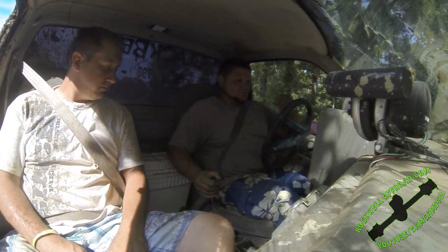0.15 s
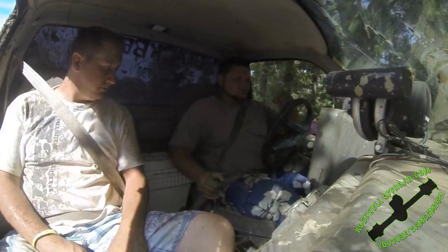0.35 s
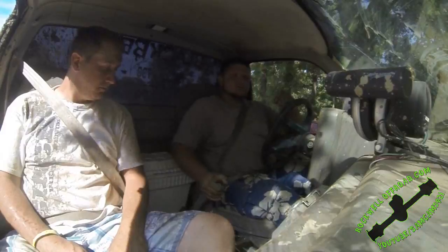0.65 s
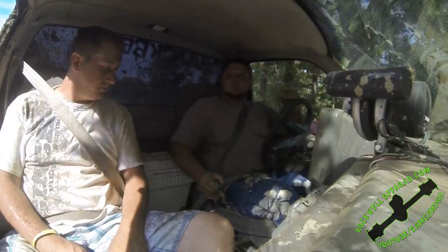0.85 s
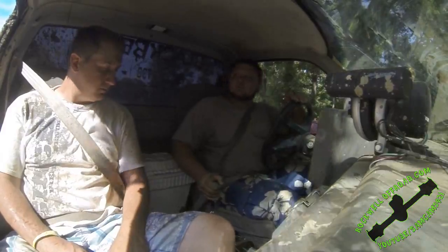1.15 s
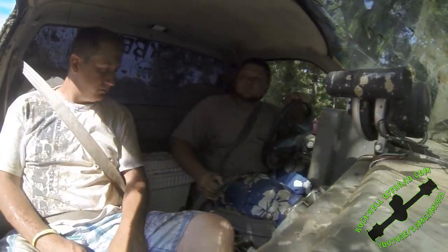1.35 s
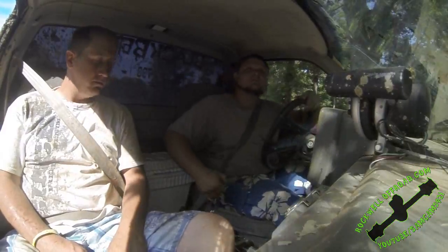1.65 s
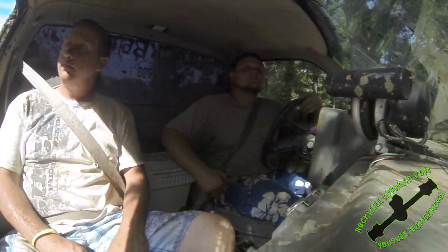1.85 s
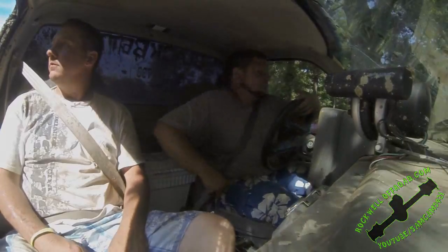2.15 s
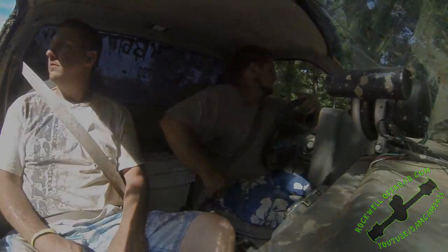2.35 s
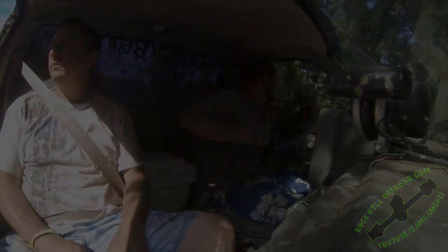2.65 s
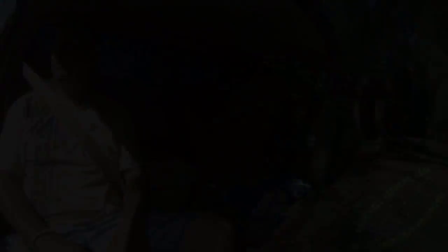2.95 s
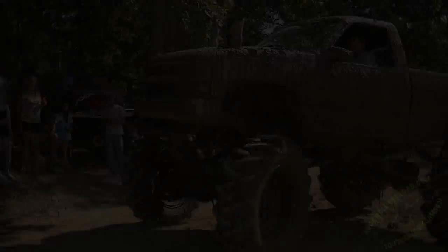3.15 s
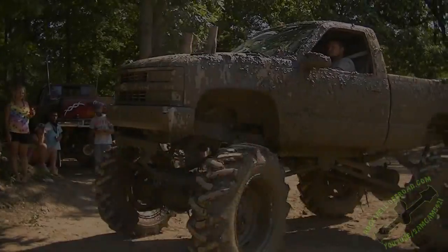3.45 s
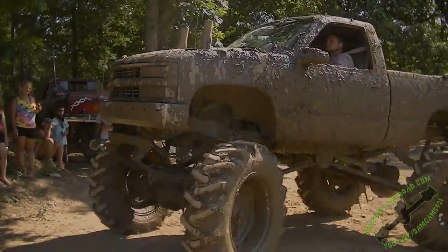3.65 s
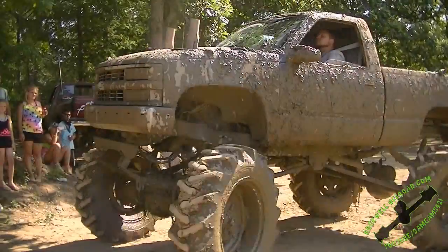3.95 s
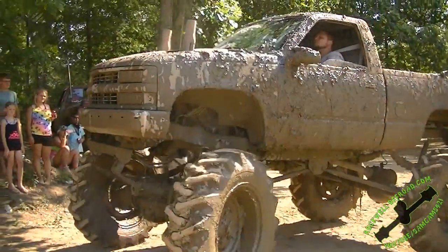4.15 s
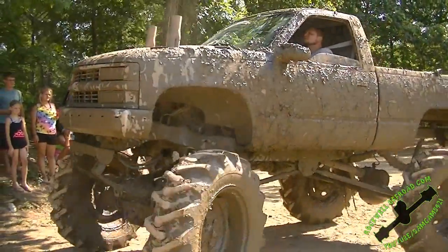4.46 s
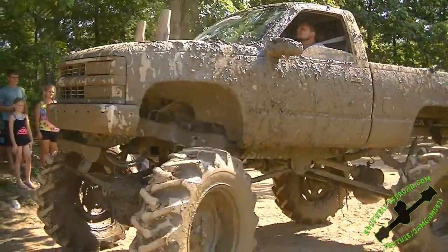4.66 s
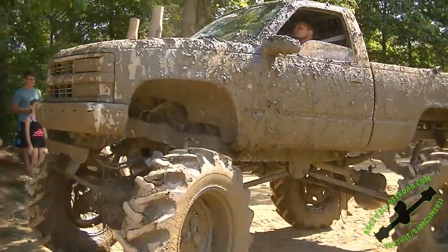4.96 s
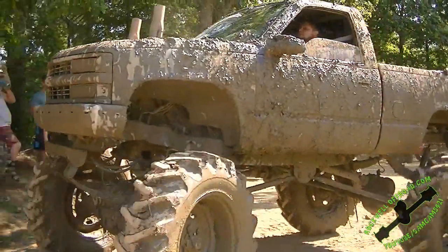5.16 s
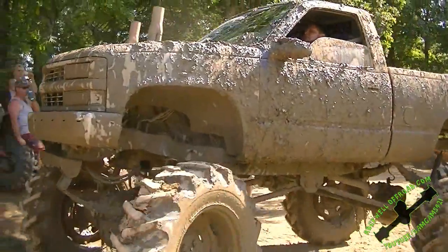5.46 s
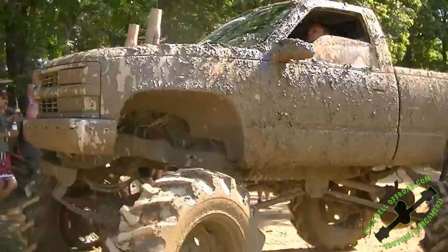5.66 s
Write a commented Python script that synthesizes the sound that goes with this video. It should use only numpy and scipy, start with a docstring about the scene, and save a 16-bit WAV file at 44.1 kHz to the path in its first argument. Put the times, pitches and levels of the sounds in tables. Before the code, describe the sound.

A big truck's V8 lopes at idle, heard inside the cab as a thumping, stumbling boom with bouts of muffled clatter and faint ticks from a loose fitting. One hard knock comes after about a second. The cab fades out, and a truck's open exhaust stacks fade in close by outdoors, louder and harsher, barking and rasping with sharp fuel pops that overload the microphone.

```python
"""First a mud truck's V8 lopes at idle, heard in the cab: its firings pump the air into a thumping,
stumbling boom and shake out bouts of muffled clatter, while a loose fitting ticks. After a second
comes one knock. By three seconds the cab has faded out, and a truck with open exhaust stacks fades in,
close by outside. Each firing sends a shock up its pipe that bounces to and fro and tears out a burst
of jet noise at every return; fuel pops join in and overload the microphone."""
import sys
import numpy as np
from scipy import signal
from scipy.fft import rfft, irfft, next_fast_len
from scipy.io import wavfile
from scipy.ndimage import uniform_filter1d, map_coordinates

SR = 44100
rng = np.random.default_rng(int(sys.argv[2]) if len(sys.argv) > 2 else 0)


def persist_wave(psi):
    """Save psi, clipped to +-1, as 16-bit WAV."""
    counts = np.round(np.clip(psi, -1, 1) * 32767).astype(np.int16)
    wavfile.write(sys.argv[1], SR, np.atleast_2d(counts).T)


N = 255780

# speed of the engine outside: time_s, speed_rpm
OUTSIDE_SPEED = [(3.056, 799), (3.9, 803), (4.15, 772), (4.35, 803), (4.8, 795), (5.05, 820), (5.25, 812),
                 (5.4, 775), (5.55, 722), (5.8, 675)]
# prominent firings of a cycle, spaced by unequal pipes: place_in_firings, strength_db, extra_bark_db
CYLINDERS = [(.15, -1.5, -2.5), (.72, 0, -1), (1.92, -2.3, 2), (3.1, -.8, -.5), (3.58, -1.5, 2.5),
             (5.45, -4, 1), (6.12, -.8, 1)]
# harder, later burns: time_s, bark_change_db, rasp_change_db
HARD_BURNS = [(3.173, -0.5, 0), (3.366, 3, 1.5), (3.4, 2.5, 1.5), (3.475, 0.5, 0.5), (3.512, 1, 0.5),
              (3.675, -3.5, -1.5), (3.821, -1.5, 1), (3.868, 0.5, -0.5), (3.921, -0.5, 1.5),
              (3.97, -0.5, -0.5), (4.022, -0.5, 0), (4.17, -4, 1.5), (4.225, -0.5, 1.5), (4.278, -1.5, 1),
              (4.379, -0.5, 1), (4.433, 1, 2.5), (4.529, -1.5, 1.5), (4.625, -4, 0), (4.68, -3, 2),
              (4.73, -2, 4), (4.778, -2.5, 3), (4.875, 1, 1.5), (4.925, 1, 3), (4.97, 0, 2.5),
              (5.028, -2, 2), (5.075, -0.5, 1), (5.174, -0.5, 6), (5.225, -1, 0), (5.272, -1.5, 1.5),
              (5.324, -1, 0), (5.424, -2.5, -0.5), (5.53, -1, 2.5), (5.64, -1, 1), (5.71, -1.5, 1.5),
              (5.775, 0, 0.5)]
# misfires, mostly slight dips in the exhaust: time_s, change_db
MISFIRES = [(3.192, -2.5), (3.34, -4), (3.49, -2), (3.595, -1), (3.787, -3), (3.893, -2.5), (4.042, -2.5),
            (4.099, -0.5), (4.2, -1.5), (4.254, -2), (4.345, -1), (4.393, -0.5), (4.492, -0.5),
            (4.548, -0.5), (4.648, 1), (4.85, 1), (5.147, -0.5), (5.242, -3), (5.293, 1), (5.44, 1),
            (5.499, -0.5)]
# unburnt fuel igniting in the stacks: time_s, level_db, pitch_hz, half_length_s
POPS = [(3.421, -4, 750, .005), (3.624, -4.5, 1080, .004), (3.686, -6, 980, .008), (3.723, -5.5, 870, .004),
        (3.774, -3, 870, .005), (3.922, -6, 530, .004), (3.994, -3, 810, .008), (4.026, -3, 870, .004),
        (4.161, -4, 600, .004), (4.175, -4, 960, .005), (4.295, -2, 1150, .007), (4.327, -2, 1150, .008),
        (4.379, -5, 950, .004), (4.424, -6, 890, .004), (4.447, -4, 1300, .004), (4.48, -5, 1010, .004),
        (4.587, -2, 870, .004), (4.599, -3, 1250, .004), (4.627, -4, 820, .005), (4.68, -2, 610, .005),
        (4.777, -3, 1230, .005), (4.879, -1, 710, .005), (4.902, -4, 700, .004), (4.928, -1, 1220, .005),
        (4.979, -4, 930, .004), (4.996, -5, 1040, .003), (5.025, -5, 790, .004), (5.126, 0, 620, .004),
        (5.174, -5, 590, .005), (5.275, -2, 820, .007), (5.306, -5, 550, .004), (5.319, -1, 1070, .004),
        (5.374, -6, 1150, .005), (5.423, -4, 1100, .004), (5.475, -1, 1110, .005), (5.528, -5, 740, .005),
        (5.589, -5, 860, .004)]
# spectra of the shock leaving the pipe, the jet's bark and its rasp: frequency_hz, gain_db
SHOCK_SPECTRUM = [(20, -13), (65, -21), (100, -15), (170, -1.5), (215, 0), (255, 3.5), (320, 1.5),
                  (390, -3), (460, -4.5), (530, 4.5), (700, -8), (1600, -10), (4000, -73)]
BARK_SPECTRUM = [(150, -23.5), (300, -5.5), (420, -2.5), (560, -0.5), (700, 1.5), (900, 2.5), (1250, -2),
                 (1600, -11.5), (2300, -10), (3200, -21), (5000, -25), (12000, -47)]
RASP_SPECTRUM = [(600, -44.5), (1500, 1.5), (3000, 1.5), (4200, -1.5), (5200, -2.5), (7000, -1.5),
                 (9000, -3.5), (10800, -4), (12500, -10), (15800, -17)]

# speed of the engine heard in the cab: time_s, firing_rate_hz
CAB_SPEED = [(0, 43), (.15, 43.6), (.45, 44), (.65, 41.6), (.77, 48), (.86, 55.5), (1.08, 50), (1.25, 45.3),
             (1.5, 50.4), (1.66, 57), (1.8, 47), (1.96, 37.4), (2.13, 44.7), (2.43, 41.2), (2.6, 48),
             (3.05, 45)]
# throb at the firing rate, and drone of the cab's air resonance: time_s, level_db
THROB_LEVEL = [(0, -17.5), (.18, -19), (.23, -23), (.29, -19), (.46, -16.5), (.52, -22), (.63, -15),
               (.72, -19), (.79, -20), (.86, -20.5), (1.05, -21), (1.26, -17.5), (1.4, -18.5), (1.52, -20),
               (1.65, -16), (1.74, -24), (1.8, -17.5), (1.87, -32), (1.96, -19.5), (2.13, -15), (2.2, -24),
               (2.33, -20.5), (2.44, -17.5), (2.54, -22), (2.78, -20), (2.9, -19.5)]
DRONE_LEVEL = [(0, -22.5), (.14, -31), (.22, -37), (.28, -22.5), (.44, -24.5), (.51, -28), (.62, -18.5),
               (.86, -26), (1.0, -30), (1.3, -28), (1.39, -28), (1.5, -31), (1.75, -29), (1.88, -29.5),
               (2.13, -25.5), (2.24, -36), (2.42, -30), (2.54, -32), (2.63, -30), (2.75, -40)]
# strong burns thumping the cab: time_s, boom_change_db, panel_change_db
CAB_THUMPS = [(.13, 6, -8), (.177, 6.5, 4), (.29, 4, 2), (.365, 1.5, 4), (.575, 2.5, 1), (.636, -1, 3),
              (.717, 1, 1), (.84, 1.5, -1), (.883, 1, -1), (.975, 8, 3), (1.086, 3.5, 2), (1.21, 4, 2),
              (1.287, 0, 2), (1.458, 6, -3), (1.565, 4.5, 3), (1.662, 3.5, 2.5), (1.793, 6, 1),
              (1.948, 7, 0), (2.136, 3, 4.5), (2.266, 7.5, 1.5), (2.345, 2, 0), (2.432, 2.5, -4),
              (2.517, 3, 1), (2.637, 2, 0.5)]
# stumbles of the engine, in which the boom drops: time_s, change_db
STUMBLES = [(.1, -2), (.225, -7), (.245, -9), (.34, -4), (.53, -6), (.605, -4), (.68, -6), (.76, 0),
            (.998, -9), (1.045, 0), (1.16, -4), (1.255, -3), (1.513, -5), (1.603, -8), (1.705, 0),
            (1.76, 0), (1.86, 0), (1.915, 0), (2.19, -3), (2.225, -8), (2.305, -5), (2.368, -13),
            (2.485, -5), (2.705, -7), (2.82, -8), (2.92, -5)]
# bouts of harder shaking: start_s, length_s, rise_db
SHAKES = [(0, 0.0082, 27), (0.064, 0.092, 7.5), (0.234, 0.066, 7), (0.489, 0.14, 8), (0.767, 0.13, 5.5),
          (0.942, 0.19, 4.5), (1.356, 0.11, 8), (1.52, 0.19, 4), (1.723, 0.073, 6), (1.89, 0.23, 6.5),
          (2.226, 0.26, 7), (2.571, 0.056, 7.5)]
# harder engine beats: start_s, level_db
CLANKS = [(.421, -43), (.795, -43), (.903, -43), (1.022, -44), (1.437, -43), (1.531, -39), (1.632, -40),
          (1.65, -41), (1.77, -37), (2.121, -35.5), (2.231, -44), (2.774, -43), (2.862, -50)]
# a first touch, the hard knock and its rebound: start_s, level_db
KNOCK_BLOWS = [(1.0688, -29), (1.0707, -22), (1.0765, -35)]
# ticks of the loose fitting: start_s, level_db
TICKS = [(.124, -44), (.172, -41.5), (.183, -44.5), (.285, -43), (.306, -48), (.57, -48), (.633, -48),
         (.837, -49), (.885, -46), (.974, -44), (1.088, -49), (1.209, -45), (1.286, -51), (1.455, -48),
         (1.494, -50), (1.547, -48), (1.582, -48), (1.661, -42), (1.785, -45), (1.799, -46), (1.946, -49),
         (2.13, -43), (2.267, -48), (2.444, -43), (2.637, -47), (2.74, -47), (2.874, -50), (2.957, -50)]
# spectra of cab boom, panels, clatter through the firewall, knock contact, ticks: frequency_hz, gain_db
BOOM_SPECTRUM = [(8, -56.5), (19, 1), (28, 3.5), (42, -0.5), (60, -0.5), (75, 1.5), (90, -8.5), (110, -11),
                 (170, -20), (300, -42), (600, -80)]
PANEL_SPECTRUM = [(70, -25.5), (120, -4), (160, -1.5), (200, -11), (250, -1.5), (350, -18), (440, -9),
                  (540, -24), (700, -15.5), (1000, -29), (2000, -66)]
CLATTER_SPECTRUM = [(500, -30), (900, -8), (1200, -2), (1400, -4), (1620, -3.5), (1950, -9), (2250, -9.5),
                    (2750, -14), (3250, -18), (3500, -21), (3850, -20.5), (4300, -25), (5100, -27),
                    (6500, -31.5), (9500, -38), (11800, -46), (14000, -59)]
CONTACT_SPECTRUM = [(400, 6), (1400, 1), (2600, 2.5), (3900, 0), (4900, -6), (5900, 3), (6600, -32)]
TICK_SPECTRUM = [(800, -28), (3000, 10), (5000, 12.5), (7000, 2.5), (10500, -4), (12000, -10.5),
                 (15000, -29)]
# resonances of the firewall and of the knocked object: frequency_hz, bandwidth_hz, gain_db
FIREWALL_MODES = [(1203, 72, -1), (1596, 64, 1), (1717, 44, -2.5), (2198, 51, -6), (3120, 48, -14),
                  (3270, 75, -15)]
KNOCK_MODES = [(577, 130, -9), (890.3, 120, -7), (1140, 160, -3.5), (1420, 190, 2), (1680, 140, 3.5),
               (2540, 140, 3.5), (3030, 190, -5), (3400, 130, -5), (3880, 150, -10), (4120, 150, -8),
               (4860, 160, -22), (5980, 120, -10)]

ROUND_TRIP_S = 0.00517  # a shock's travel down the stack and back
BURN_S, THUMP_S, STUMBLE_S = 0.018, 0.014, 0.012  # half widths of the brief changes of level


def stacks(idle_rpm=800, bark_db_per_rpm=0.01, rasp_db_per_rpm=0.024):
    """Reflection at an open end: each returning shock inverts and throws out a puff of turbulent gas."""
    times, size_db, extra_bark_db, trip = shocks()
    length_draw, bark_draw, hiss_draw, delay_draw, front_draw, sign_draw = (
        rng.standard_normal((len(times), 6)).T)
    nearest = np.searchsorted((times[1:] + times[:-1]) / 2, np.arange(N) / SR)
    hard_bark_db, hard_rasp_db = swells(HARD_BURNS, BURN_S)
    misfire_db, = swells(MISFIRES, BURN_S)
    flow = gas_flow(times, size_db, trip, nearest, length_draw) * amp(hard_rasp_db / 2 + misfire_db / 4)
    puffs = turbulence(flow) * amp(size_db)[nearest]
    jet = unit(puffs * amp(extra_bark_db[nearest] + bark_draw[nearest]) * noise(BARK_SPECTRUM))
    # steepened wave fronts break the hiss into crackles, with one sharp crack in each puff
    crackle = amp(4.2 * wobble(2600) + 1.5 * wobble(500))
    hiss = unit(puffs * amp(hiss_draw[nearest]) * crackle * rng.standard_normal(N))
    fronts = times + .0005 * delay_draw
    cracks = unit(pulses(fronts, amp(size_db + 3 * front_draw) * np.sign(sign_draw), 2 / SR))
    rasp = unit(coloured(hiss + amp(-7) * cracks, RASP_SPECTRUM))
    reflections = pulses(fronts, (-1) ** trip * amp(0.5 * size_db + 2 * front_draw), 0.000099)
    thump = unit(coloured(reflections, SHOCK_SPECTRUM))
    # a faint, wavering hum at twice the firing rate
    hum = amp(3 * wobble(10)) * np.sin(2 * np.pi * 16 * cycles_turned() + 0.25 * wobble(12))
    bark = amp(-2) * jet + amp(-5) * thump + amp(-23) * hum
    over_idle_rpm = curve(OUTSIDE_SPEED) - idle_rpm
    bark_gain = amp(-13 + bark_db_per_rpm * over_idle_rpm + hard_bark_db)
    rasp_gain = amp(-16.5 + rasp_db_per_rpm * over_idle_rpm + hard_rasp_db)
    return (bark_gain * bark + rasp_gain * rasp) * amp(misfire_db)


def shocks(max_trips=9, trip_loss_db=0.8, sustain_db=-3.6, scatter_db=0.8):
    """Damped pipe echoes: a shock weakens to what the flow sustains, until the next firing overruns it."""
    t, cycles = np.arange(N) / SR, cycles_turned()
    place, strength_db, extra_bark_db = np.transpose(CYLINDERS)
    due_cycles = (np.arange(int(cycles[-1]) + 2)[:, None] + place / 8).ravel()
    start = np.interp(due_cycles, cycles, t, right=t[-1] + 1)[:, None]
    trip = np.arange(max_trips)
    # the heat of the gas, and so the travel time, differs from firing to firing
    travel_s = ROUND_TRIP_S * (1 + rng.normal(0, .02, start.shape))
    times = start + travel_s * trip + rng.normal(0, .0002, (len(start), max_trips))
    size_db = np.maximum(np.resize(strength_db, start.shape) - trip_loss_db * trip, sustain_db)
    size_db = size_db + rng.normal(0, scatter_db, start.shape)
    bark_db = np.resize(extra_bark_db, start.shape) * np.exp(-trip / 2)
    alive = (times < np.roll(start, -1, 0) - ROUND_TRIP_S / 2) & (times < t[-1])
    return times[alive], size_db[alive], bark_db[alive], np.broadcast_to(trip, times.shape)[alive]


def cycles_turned():
    """A four-stroke cycle takes two turns: the running count of cycles of the engine outside."""
    running = np.arange(N) / SR > OUTSIDE_SPEED[0][0]
    return np.cumsum(curve(OUTSIDE_SPEED) * running) / SR / 120


def gas_flow(times, size_db, trip, nearest, length_draw, blowdown_s=0.022, lag_s=0.003):
    """Blowdown: the emptying cylinder's outflow merges a firing's first puffs; later ones stand apart."""
    half_width_s = (0.0019 + 0.0005 * np.exp(-trip / 1.3)) * amp(1.5 * length_draw)
    age = np.arange(N) / SR - times[nearest]
    spurts = np.exp(-(age / half_width_s[nearest]) ** 2) * amp(size_db)[nearest]
    outflow = pulses(times + lag_s, (trip == 0) * amp(size_db - 8), blowdown_s)
    return spurts + outflow


def turbulence(flow, threshold_db=-8.7, calm_db=-22):
    """Onset of turbulence: a jet tears into noise above a threshold flow and hisses faintly below it."""
    tearing = (flow / amp(threshold_db)) ** 8
    return amp(calm_db) + tearing / (1 + tearing)


def pops(wander_octaves=0.55, steepening=0.6):
    """Nonlinear steepening: a fuel pop is a few steep, uneven waves at each round trip of the pipe."""
    t, out = np.arange(N) / SR, np.zeros(N)
    wander = 2 ** (wander_octaves * wobble(900))
    for (time_s, db, hz, half_length_s), start_phase in zip(POPS, rng.uniform(0, 2 * np.pi, len(POPS))):
        near = np.abs(t - time_s) < 2 * half_length_s
        age = t[near] - time_s
        envelope = np.exp(-(age / half_length_s) ** 4)
        returns = np.minimum(2.5 * np.cos(np.pi * age / ROUND_TRIP_S) ** 4, 1)
        phase = start_phase + 2 * np.pi * hz * np.cumsum(wander[near]) / SR
        out[near] += amp(db) * envelope * returns * np.sin(phase + steepening * np.sin(phase))
    return out


def firing_phase():
    """Phase is the integral of frequency: the running count of firings heard in the cab."""
    return np.cumsum(curve(CAB_SPEED)) / SR


def cab_firings(jitter_s=0.0023):
    """Combustion varies from cycle to cycle, so the firing times are slightly uneven."""
    phase = firing_phase()
    times = np.interp(np.arange(int(phase[-1])), phase, np.arange(N) / SR)
    return times + jitter_s * rng.standard_normal(len(times))


def cab_air(firings, resonance_hz=90.3, waver_rad=0.45):
    """Forced vibration of enclosed air: an even throb, lumps from unequal burns and a resonant drone."""
    lumps = coloured(pulses(firings, rng.standard_normal(len(firings)), 0.0027), BOOM_SPECTRUM)
    lumps = lumps - uniform_filter1d(lumps, SR // 10)
    local_rms = np.sqrt(np.abs(uniform_filter1d(lumps ** 2, SR // 10)) + 1e-12)
    throb = amp(curve(THROB_LEVEL)) * np.sin(2 * np.pi * firing_phase())
    drone_phase = 2 * np.pi * resonance_hz * np.arange(N) / SR + waver_rad * wobble(9.5)
    drone = amp(curve(DRONE_LEVEL)) * np.sin(drone_phase)
    lope_db = swells(CAB_THUMPS, THUMP_S)[0] + swells(STUMBLES, STUMBLE_S)[0]
    return (amp(-23.5) * lumps / local_rms + np.sqrt(2) * (throb + drone)) * amp(lope_db)


def cab_body(firings, attack_s=0.053, release_s=0.04, scatter_db=4.0):
    """Structure-borne sound: panels and firewall clatter beat with the firings and swell in bouts."""
    t, shake_db = np.arange(N) / SR, np.zeros(N)
    for start_s, length_s, rise_db in SHAKES:
        ramp = np.minimum((t - start_s) / attack_s, (start_s + length_s - t) / release_s)
        shake_db += rise_db * np.clip(ramp + .5, 0, 1)
    strengths = amp(scatter_db * rng.standard_normal(len(firings)))
    beat = unit(2 + pulses(firings, strengths, 0.012))
    ring = ringing(rng.standard_normal(N), FIREWALL_MODES)
    panels = amp(-43.5 + shake_db + swells(CAB_THUMPS, THUMP_S)[1]) * beat * noise(PANEL_SPECTRUM)
    clatter_gain = amp(-52 + 0.77 * shake_db) * beat + blows(CLANKS, t60_s=0.04, attack_s=0.00076)
    return panels + clatter_gain * (noise(CLATTER_SPECTRUM) + ring)


def knock(crack_db=-12, thud_hz=115):
    """Impact excites modes: something hard cracks, rings briefly and rebounds over a dull thud."""
    start_s = KNOCK_BLOWS[0][0]
    contact = noise(CONTACT_SPECTRUM)
    ring = ringing(contact, KNOCK_MODES)
    thud = np.sin(2 * np.pi * thud_hz * (np.arange(N) / SR - start_s))
    thud *= blows([(start_s, -26)], t60_s=0.1, attack_s=0.002)
    return blows(KNOCK_BLOWS, t60_s=0.024, attack_s=0.0002) * (ring + amp(crack_db) * contact) + thud


def fitting():
    """Brief contact gives a bright spectrum: a loose fitting ticks now and then."""
    return amp(-1) * blows(TICKS, t60_s=0.009, attack_s=0.0001) * noise(TICK_SPECTRUM)


def trees(x, delay_s=0.012, t60_s=0.35):
    """Scattering: the edge of the wood returns a faint, dull, diffuse echo."""
    t = np.arange(SR // 2) / SR
    tail = rng.standard_normal(len(t)) * amp(-60 * t / t60_s) * (t > delay_s)
    echo = signal.fftconvolve(x, tail / np.linalg.norm(tail))[:N]
    return coloured(echo, [(500, -21), (3000, -27), (12000, -32)])


def amp(db):
    """Decibels to amplitude ratio."""
    return 10 ** (np.asarray(db) / 20)


def unit(x):
    """Normalisation to rms 1 over the time that x sounds."""
    power = x ** 2
    sounding = uniform_filter1d(power, SR // 10) > power.mean() / 20
    return x / np.sqrt(np.mean(power[sounding]))


def curve(rows):
    """Linear interpolation of (time_s, value) rows at every sample."""
    return np.interp(np.arange(N) / SR, *np.transpose(rows))


def wobble(rate_hz):
    """Smooth random modulation: a spline through rate_hz knots a second."""
    knots = rng.standard_normal(int(N * rate_hz / SR) + 4)
    return map_coordinates(knots, [np.arange(N) * rate_hz / SR])


def swells(rows, half_width_s):
    """Gaussian changes of level: one dB curve for each column after the time."""
    times, *columns = np.transpose(rows)
    bells = np.exp(-((np.arange(N) / SR - times[:, None]) / half_width_s) ** 2)
    return [db @ bells for db in columns]


def pulses(times, sizes, width_s):
    """Convolution of an impulse train with a raised cosine, width_s from foot to foot."""
    train = np.bincount(np.clip(times * SR, 0, N).astype(int), sizes, N + 1)[:N]
    position = np.arange(-SR // 20, SR // 20) / SR / width_s
    return signal.fftconvolve(train, np.cos(np.pi * np.clip(position, -.5, .5)) ** 2, 'same')


def blows(rows, t60_s, attack_s):
    """Exponential rise and decay: the envelope of blows from (start_s, level_db) rows."""
    ages = [(np.maximum(np.arange(N) / SR - start_s, 0), db) for start_s, db in rows]
    return sum((1 - np.exp(-age / attack_s)) * amp(db - 60 * np.minimum(age / t60_s, 2))
               for age, db in ages)


def filtered(x, response):
    """Linear filtering: the spectrum of x times a complex response of frequency."""
    size = 2 * next_fast_len(N // 2 + SR // 2)
    return irfft(rfft(x, size) * response(np.fft.rfftfreq(size, 1 / SR)), size)[:N]


def coloured(x, points):
    """Minimum-phase filtering through (frequency_hz, gain_db) points."""
    def response(hz):
        point_hz, db = np.transpose(points)
        gain = amp(np.interp(np.log(hz + 1), np.log(point_hz + 1), db))
        cepstrum = irfft(np.log(gain))
        half = len(cepstrum) // 2
        causal_fold = np.r_[1, np.full(half - 1, 2), 1, np.zeros(half - 1)]
        return np.exp(rfft(cepstrum * causal_fold))
    return filtered(x, response)


def noise(points):
    """White noise shaped to a spectrum, at rms 1."""
    return unit(coloured(rng.standard_normal(N), points))


def ringing(x, modes):
    """Modal superposition: x drives damped resonators of alternating sign; the sum has rms 1."""
    def response(hz):
        return sum((-1) ** k * amp(db) * 1j * hz * width / (centre ** 2 - hz ** 2 + 1j * hz * width)
                   for k, (centre, width, db) in enumerate(modes))
    return unit(filtered(x, response))


def scene(cab_ends_s=3.055, fade_out_s=0.44, outside_starts_s=3.05, fade_in_s=0.77):
    """Superposition: first the cab's sources, then those outside, with linear fades through silence."""
    t = np.arange(N) / SR
    firings = cab_firings()
    inside = cab_air(firings) + cab_body(firings) + fitting() + knock()
    exhaust = stacks() + pops()
    outside = exhaust + trees(exhaust)
    fade_out = np.clip((cab_ends_s - t) / fade_out_s, 0, 1)
    fade_in = np.clip((t - outside_starts_s) / fade_in_s, 0, 1)
    return (inside * fade_out + outside * fade_in)[None]


def record(dry, full_scale=0.95, cutoff_hz=15850):
    """Saturation and band limiting: the loudest barks flatten, and the highest treble is cut off."""
    clipped = dry[0] / (1 + np.abs(dry[0] / full_scale) ** 10) ** (1 / 10)
    return filtered(clipped, lambda hz: np.clip((cutoff_hz - hz) / 200 + .5, 0, 1))[None]


dry = scene()
out = record(dry)
persist_wave(out)
```